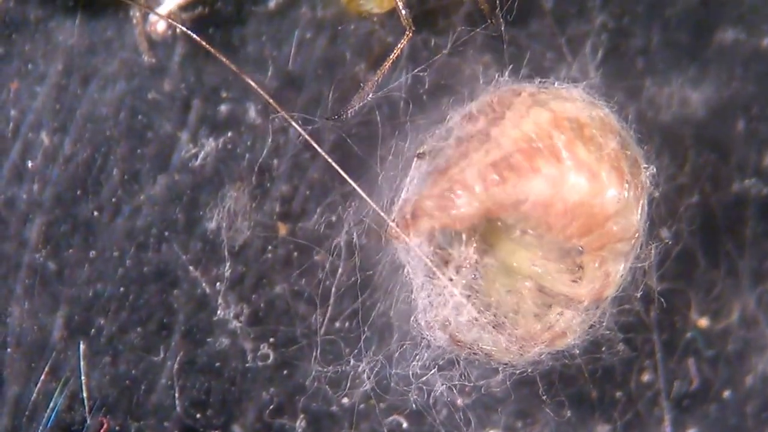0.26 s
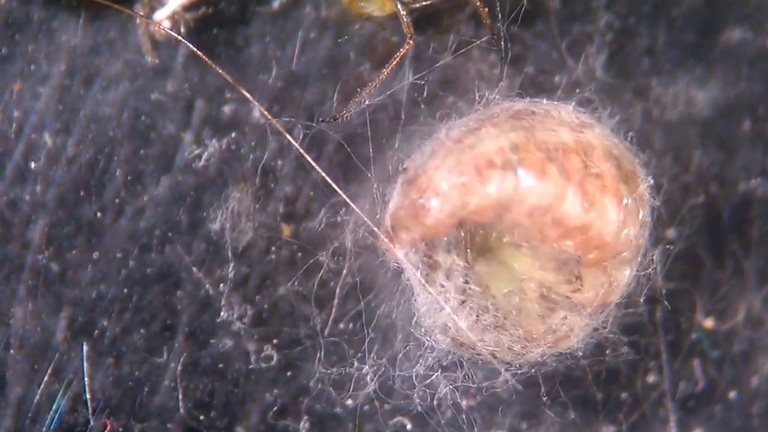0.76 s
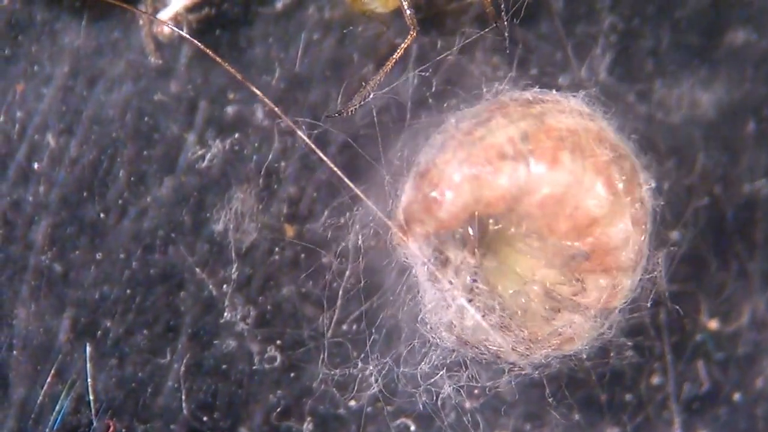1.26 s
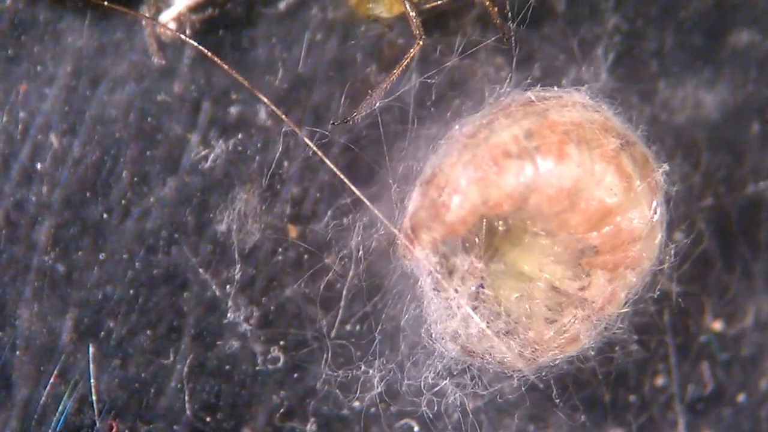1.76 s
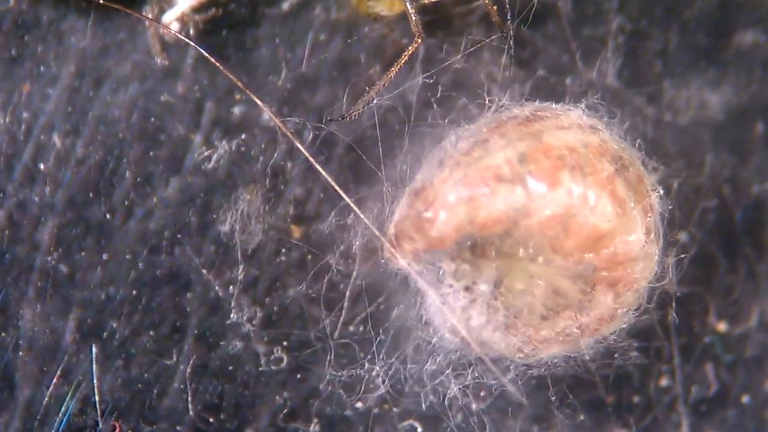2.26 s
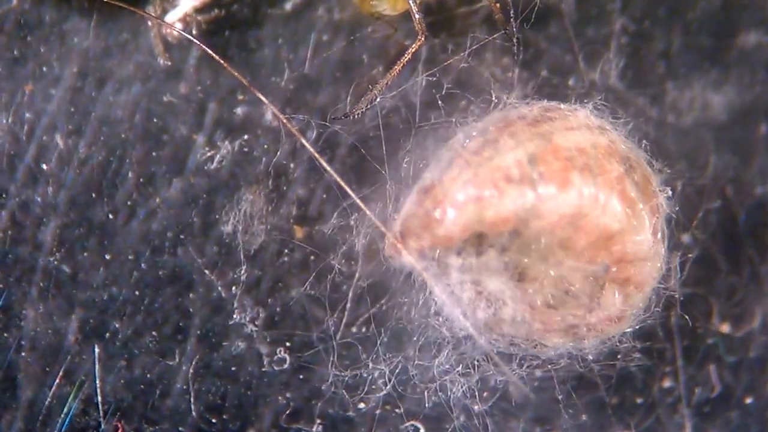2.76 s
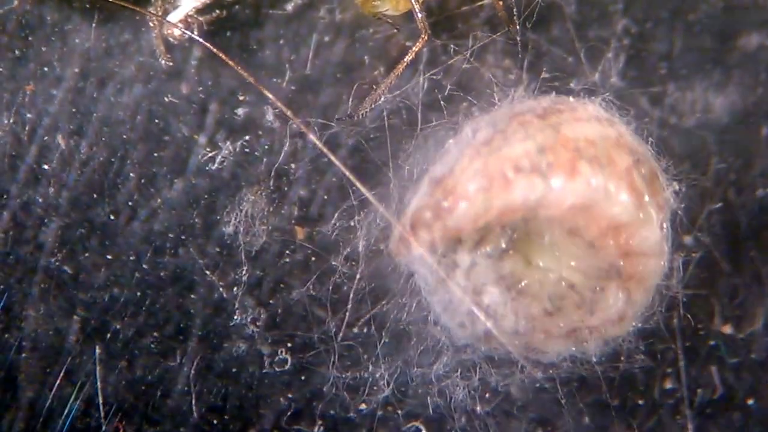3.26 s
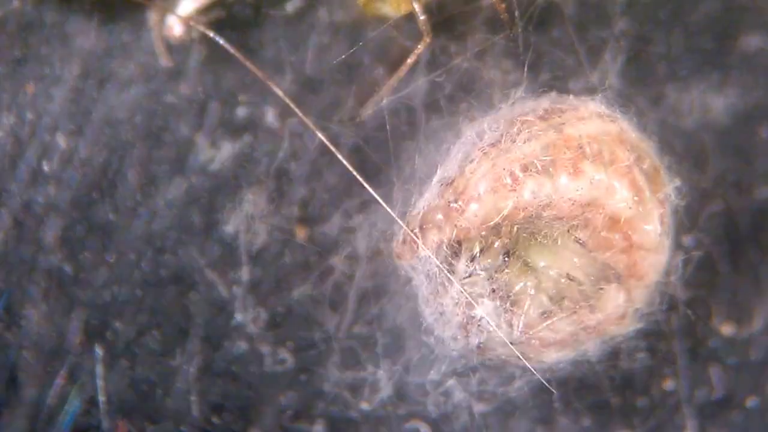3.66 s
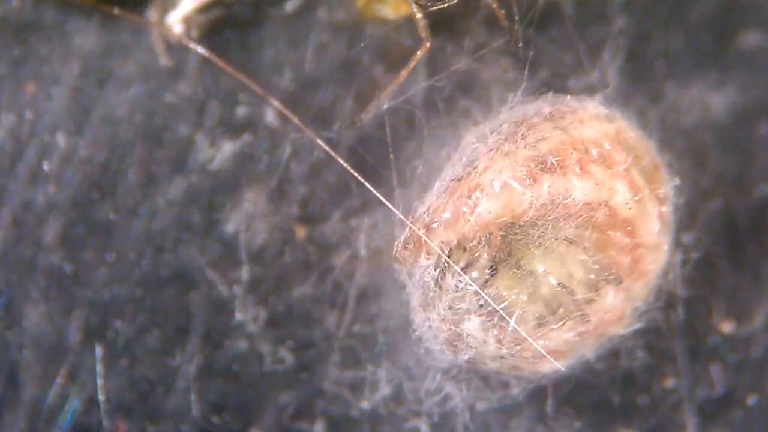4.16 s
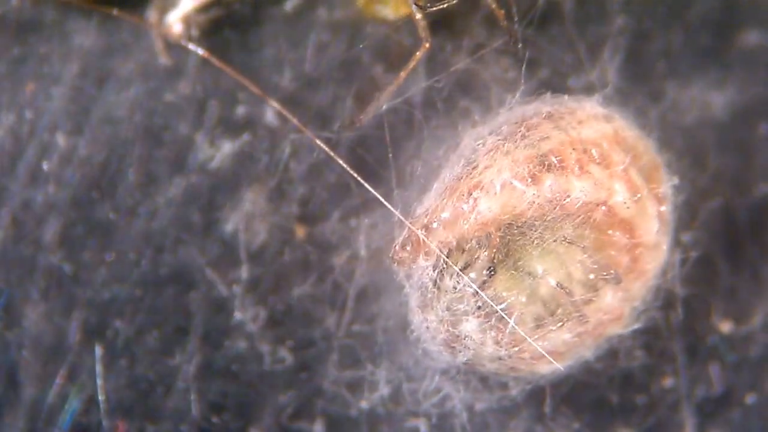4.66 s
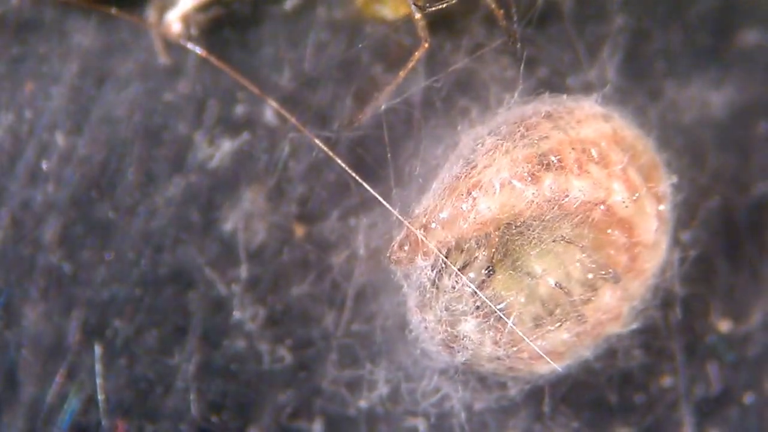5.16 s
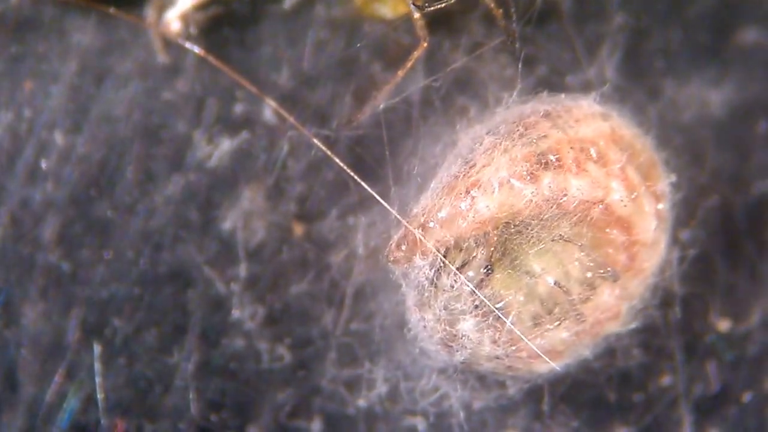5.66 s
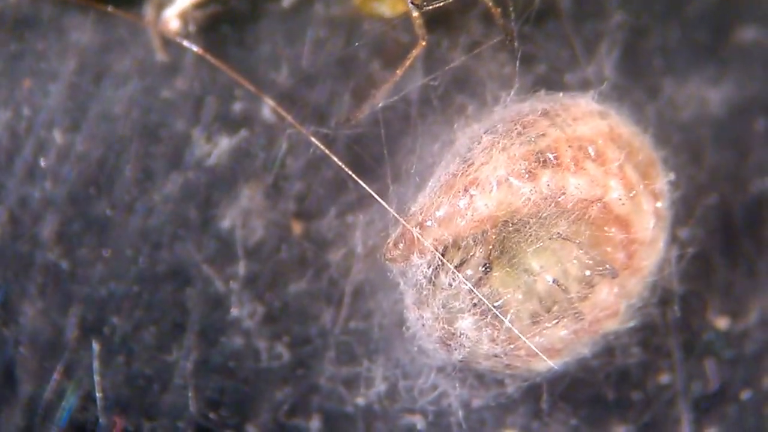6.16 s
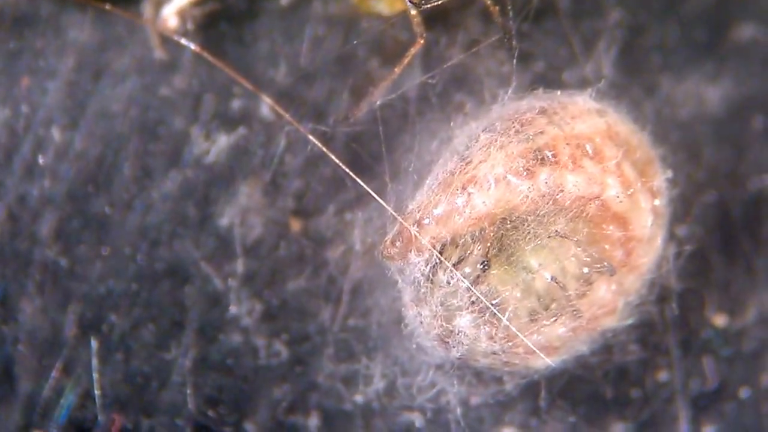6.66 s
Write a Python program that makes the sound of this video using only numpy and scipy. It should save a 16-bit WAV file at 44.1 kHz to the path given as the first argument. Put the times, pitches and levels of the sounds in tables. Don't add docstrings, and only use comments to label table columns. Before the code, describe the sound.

A small fan hums steadily with a slow low throb while a trembling, breathy whistle and airy rush flutter in its housing, over faint hiss.

```python
import sys
import numpy as np
from scipy import signal
from scipy.fft import rfft, irfft, next_fast_len
from scipy.io import wavfile
from scipy.ndimage import uniform_filter1d, map_coordinates

SR = 44100
rng = np.random.default_rng(int(sys.argv[2]) if len(sys.argv) > 2 else 0)


def volts_from_decibels(level):
    exponent = np.asarray(level, float) / 20
    return 10 ** exponent


def unload_audio(sound):
    columns = np.transpose(np.atleast_2d(sound))
    steps = np.round(np.clip(columns, -1, 1) * 32767)
    wavfile.write(sys.argv[1], SR, steps.astype(np.int16))


N = 305083
USUAL_DB = -62


def unit(x):
    return x / np.sqrt(np.mean(x ** 2) + 1e-20)


def along(points, hz):
    point_hz, point_db = np.transpose(points)
    return volts_from_decibels(np.interp(np.log(hz + 1), np.log(point_hz + 1), point_db))


def peaks(modes, hz):
    power = 0
    for centre_hz, width_hz, db in modes:
        power = power + volts_from_decibels(2 * db) / (1 + (2 * (hz - centre_hz) / width_hz) ** 2)
    return np.sqrt(power)


def curves(rows):
    s, *columns = np.transpose(rows)
    return [np.interp(np.arange(N) / SR, s, column) for column in columns]


def wobble(rate):
    at = np.arange(0, N + 64, 64)
    smooth = map_coordinates(rng.standard_normal(1000), [at * rate / SR])
    return np.interp(np.arange(N), at, smooth)


def noise(gain, size=N):
    m = next_fast_len(size + 8192)
    spectrum = rfft(rng.standard_normal(m)) * gain(np.fft.rfftfreq(m, 1 / SR))
    return unit(irfft(spectrum, m)[:size])


def narrow(hz, width_hz):
    turn = 2 * np.pi * np.cumsum(hz) / SR
    slow = lambda f: peaks([(0, width_hz, 0)], f) ** 2
    return noise(slow, size=len(hz)) * np.cos(turn) + noise(slow, size=len(hz)) * np.sin(turn)


def swells(rows, rest_db):
    t = np.arange(0, N + 64, 64) / SR
    power = volts_from_decibels(2 * rest_db)
    for centre_s, half_s, db in rows:
        power = power + volts_from_decibels(2 * db) * np.exp(-((t - centre_s) / half_s) ** 2)
    return np.interp(np.arange(N) / SR, t, 10 * np.log10(power))


# time_s, fan_shaft_hz, mains_hz, compressor_hz
MACHINE_SPEEDS = [(0.0, 45.128, 50.0, 46.872), (1.0, 45.122, 50.0, 46.871), (2.0, 45.119, 50.003, 46.875),
                  (3.0, 45.146, 49.993, 46.876), (4.0, 45.184, 49.992, 46.872),
                  (5.0, 45.208, 49.988, 46.875), (6.0, 45.202, 49.986, 46.88)]


def turning():
    shaft, mains, piston = (2 * np.pi * np.cumsum(hz) / SR for hz in curves(MACHINE_SPEEDS))
    together = round(.222 * SR)
    return shaft - shaft[together], mains, piston - piston[together]


# shaft_order, multiple_of_double_mains, level_db
FAN_TONES = [(0, 1, -72.5), (0, 2, -89.0), (0, 3, -83.0), (1, -3, -81.4), (1, -2, -84.9), (1, 0, -65.5),
             (1, 2, -78.6), (2, 0, -88.9), (2, 1, -78.3), (3, 0, -87.4), (3, 1, -72.5), (4, 0, -77.0),
             (5, 0, -55.9), (5, 1, -57.4), (5, 2, -89.0), (6, 0, -77.0), (7, 0, -71.5), (9, -1, -73.9),
             (9, 1, -83.0), (10, 0, -75.5), (11, -1, -82.4), (14, 1, -89.0), (15, 0, -82.6), (15, 1, -89.1),
             (20, 1, -85.1), (24, 0, -86.3)]


def fan_hum(shaft, mains):
    hum = np.zeros(N)
    for order, pull, db in FAN_TONES:
        bare_shaft = order == 1 and pull == 0
        start = 0 if bare_shaft else 2 * np.pi * rng.random()
        level = volts_from_decibels(db + .55 * wobble(2.5))
        hum += level * np.sin(order * shaft + 2 * pull * mains + start)
    return np.sqrt(2) * hum


def compressor(piston):
    return np.sqrt(2) * volts_from_decibels(-51.6 + .25 * wobble(1.5)) * np.sin(piston)


# centre_s, half_length_s, whistle_level_db
HOUSING_GUSTS = [(.17, .04, -59), (.32, 0.078, -60), (.59, 0.049, -59), (.83, .05, -59), (1.0, .05, -64),
                 (1.38, 0.089, -57), (1.62, 0.036, -59), (1.79, 0.061, -61), (2.08, .07, -61),
                 (2.29, .04, -61), (2.4, 0.052, -60), (2.61, 0.066, -59), (2.79, .04, -61),
                 (3.0, 0.044, -63), (3.25, .05, -67), (3.55, .1, -55.5), (3.75, 0.051, -60),
                 (3.93, 0.049, -56.5), (4.03, 0.047, -51.5), (4.22, 0.11, -58.5), (4.53, 0.0815, -55),
                 (4.67, 0.046, -54.5), (4.96, 0.059, -62.5), (5.17, .06, -60.5), (5.53, .08, -60),
                 (5.75, 0.12, -63), (6.1, 0.054, -57), (6.4, .09, -59.5), (6.65, 0.034, -66),
                 (6.85, 0.1, -56)]


def gust_swing():
    return swells(HOUSING_GUSTS, -71) - USUAL_DB


def whistle():
    gust_db = gust_swing()
    lag_s, sag_hz_per_db = .35, 2.5
    hz = 911 - sag_hz_per_db * uniform_filter1d(gust_db, size=round(lag_s * SR))
    tone = np.sin(2 * np.pi * np.cumsum(hz + 3.466 * wobble(12)) / SR)
    breath = volts_from_decibels(-.45 * gust_db) * narrow(hz + 14, 50)
    level_db = USUAL_DB + gust_db - 1.7 + 1.2 * wobble(18)
    return volts_from_decibels(level_db) * unit(1.93 * tone + breath)


# pitch_hz, width_hz, level_db
LOWER_CAVITY = [(917, 83, -0.5), (1112, 104, 1), (1220, 90, -14)]
# pitch_hz, width_hz, level_db
UPPER_CAVITY = [(1918, 164, -3.5), (1788, 170, -8.5), (1660, 48, -9)]
# pitch_hz, level_db (per Hz)
BLADE_EDGE = [(1900, -120), (2080, 2), (2300, -3.5), (2700, -3.5), (3060, -10.5), (3290, -5.5),
              (3600, -15.5), (3900, -36), (4300, -120)]
# centre_s, half_length_s, cavity_level_db
UPPER_PUFFS = [(.07, 0.03, -61), (.2, 0.017, -61), (.64, 0.038, -65), (.89, 0.054, -63.5),
               (1.03, 0.026, -63), (1.26, 0.033, -64), (1.42, .04, -65), (1.7, .1, -64.5), (2.6, .06, -64),
               (2.85, .09, -64), (3.25, .15, -67.5), (3.72, .07, -60.5), (4.08, 0.088, -61.5),
               (4.3, 0.15, -66), (4.93, 0.066, -63.5), (5.22, .05, -63), (5.57, 0.044, -59.5),
               (5.82, .1, -65), (6.11, 0.034, -59), (6.25, .04, -64.5), (6.45, .1, -64), (6.75, .1, -61.5)]


def airflow():
    upper_db = swells(UPPER_PUFFS, -64)
    gust_db = gust_swing()
    lasting_s, lasting_lost = .78, .33
    lasting_db = uniform_filter1d(gust_db, size=round(lasting_s * SR))
    lower_db = -63.5 + .49 * gust_db - lasting_lost * lasting_db
    edge_db = -71 + .41 * (upper_db - upper_db.mean())
    flutter = wobble(26)
    lower_level = volts_from_decibels(lower_db + 1.9 * flutter + .82 * wobble(9))
    lower = lower_level * noise(lambda f: peaks(LOWER_CAVITY, f) ** 1.57)
    upper_level = volts_from_decibels(upper_db - 2.2 + .47 * flutter + 1.3 * wobble(30))
    upper = upper_level * noise(lambda f: peaks(UPPER_CAVITY, f) ** 2.22)
    edge = volts_from_decibels(edge_db + .3 * flutter) * noise(lambda f: along(BLADE_EDGE, f))
    return lower + upper + edge


# centre_s, half_length_s, pitch_hz, glide_hz, level_db
BLADE_EDDIES = [
    (3.58, .1, 779, 20.5, -69),
    (3.719, .017, 585, 52, -66),
    (3.719, 0.047, 2325, 171.5, -70),
    (3.854, .04, 2466, 420, -67.5),
    (4.298, .18, 1306, -4.5, -72),
    (4.173, 0.13, 2180, -100, -68),
    (4.371, 0.017, 2360, 170, -69),
    (5.719, 0.064, 2520, -200, -70.5),
    (5.832, 0.03, 2540, 60, -69),
]


def eddies():
    t = np.arange(SR // 2) / SR - .25
    out = np.zeros(N + SR)
    for centre_s, half_s, hz, glide_hz, db in BLADE_EDDIES:
        track_hz = hz + glide_hz / 2 * np.clip(t / half_s, -1, 1)
        swish = volts_from_decibels(db) * np.exp(-(t / half_s) ** 2) * narrow(track_hz, 340)
        first = round((centre_s + t[0]) * SR)
        out[first:first + len(t)] += swish
    return out[:N]


# pitch_hz, level_db (per Hz)
ROOM_RUMBLE = [(12, -120), (22, -0.5), (38, 1.5), (70, -6), (130, -11), (200, -11), (350, -12), (600, -17),
               (850, -15.5), (1300, -15), (1500, -28), (2500, -120)]
# pitch_hz, width_hz, level_db
ROOM_PANELS = [(66, 16, 3), (120, 30, 0), (180, 30, 5), (216, 22, 13), (255, 50, 9), (305, 40, 10),
               (393, 16, 13), (430, 22, 4), (470, 36, 8), (538, 34, 4), (590, 30, 1), (695, 35, 4.5),
               (745, 40, 2)]


def room():
    def panels(f):
        return np.sqrt(sum(peaks([mode], f) ** 4 / volts_from_decibels(2 * mode[2]) for mode in ROOM_PANELS))
    shaken = noise(lambda f: along(ROOM_RUMBLE, f) * np.hypot(1, panels(f)))
    return volts_from_decibels(-62 + .43 * wobble(1.8)) * shaken


# pitch_hz, level_db (per Hz)
PREAMP_HISS = [(2800, -41), (3500, -5), (3820, -3.5), (4300, -1.5), (4900, -1), (5400, -4), (5950, -5.5),
               (6350, -5.5), (7100, -9.5), (8500, -11), (9600, -15), (11800, -14), (14000, -14),
               (16000, -11)]
# pitch_hz, width_hz, level_db
GRILLE_WHISTLES = [(6075, 100, 5), (6520, 90, 2), (6800, 250, -5), (7450, 200, -6), (7950, 400, -3),
                   (10690, 300, 4)]


def hiss():
    coloured = noise(lambda f: along(PREAMP_HISS, f) * np.hypot(1, peaks(GRILLE_WHISTLES, f)))
    return volts_from_decibels(-76.5 + .34 * wobble(20)) * coloured


def scene():
    shaft, mains, piston = turning()
    machines = fan_hum(shaft, mains) + compressor(piston)
    air = whistle() + airflow() + eddies()
    return (machines + air + room())[None]


def roll_off(x):
    return signal.sosfilt(signal.butter(12, 15700, fs=SR, output="sos"), x)


def record(dry):
    mix = dry + hiss()
    return roll_off(mix)


dry = scene()
out = record(dry)
unload_audio(out)
```